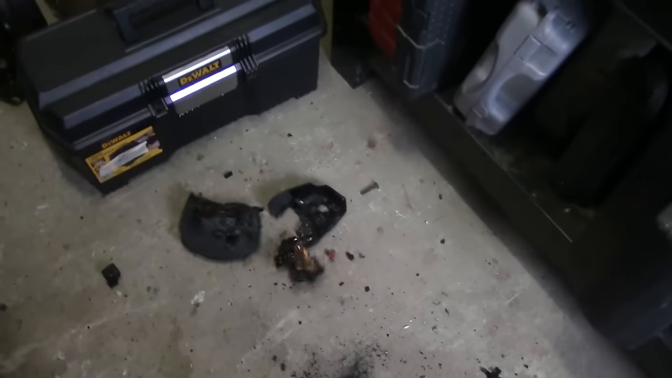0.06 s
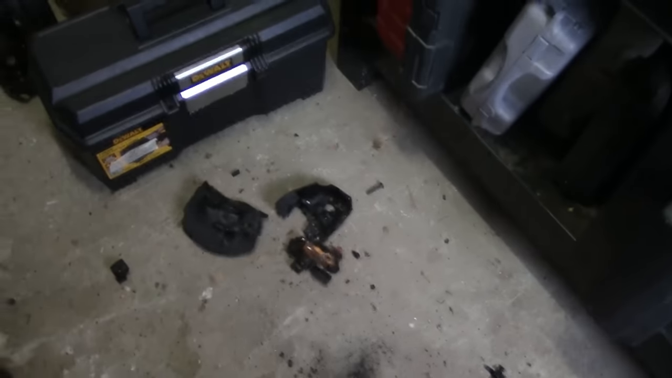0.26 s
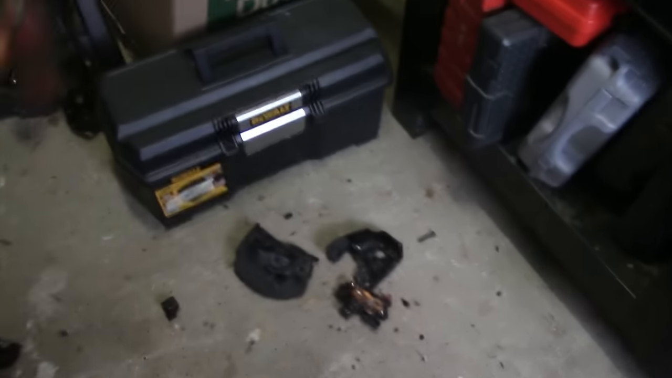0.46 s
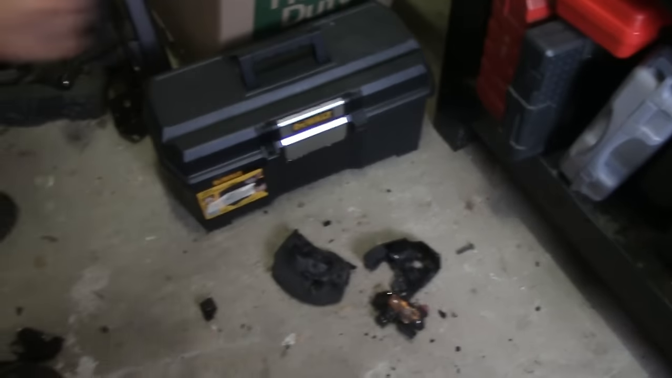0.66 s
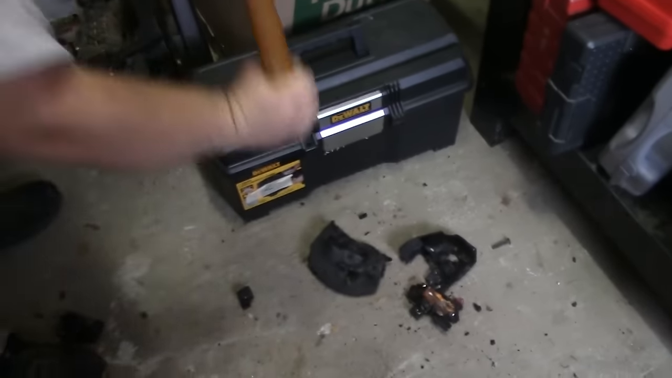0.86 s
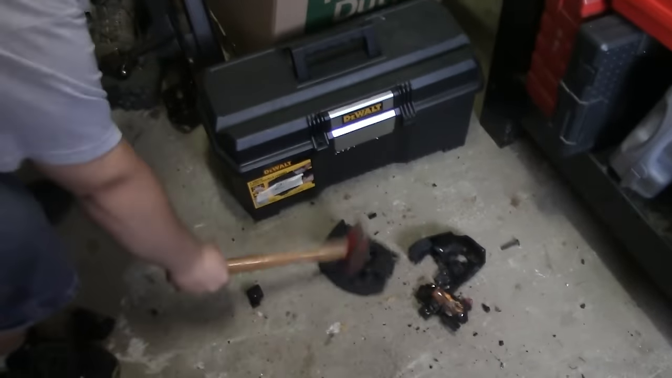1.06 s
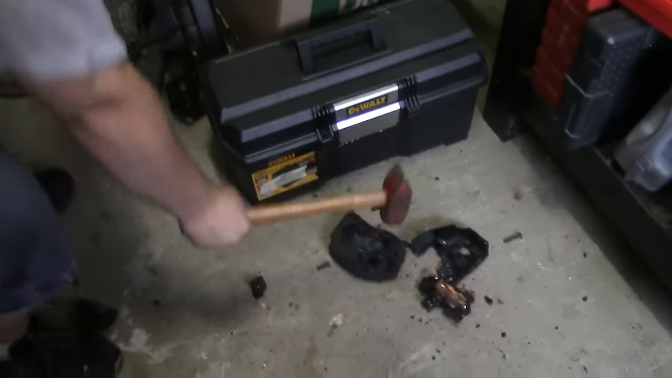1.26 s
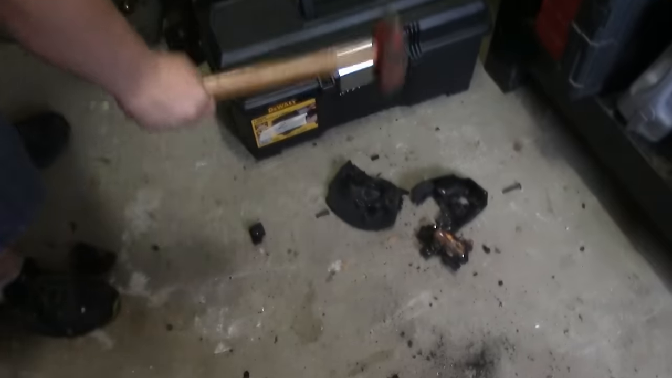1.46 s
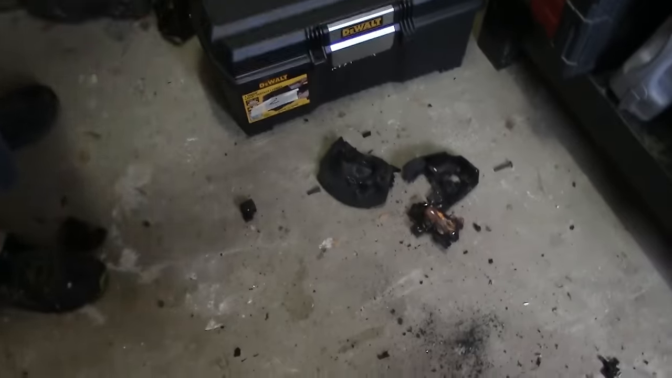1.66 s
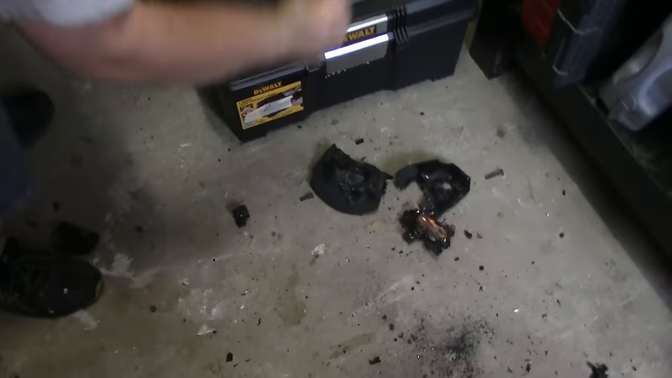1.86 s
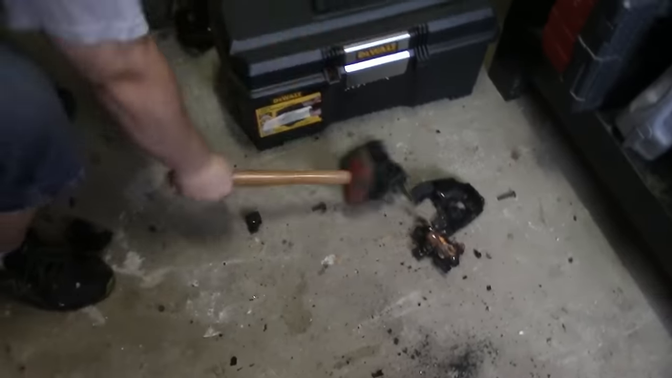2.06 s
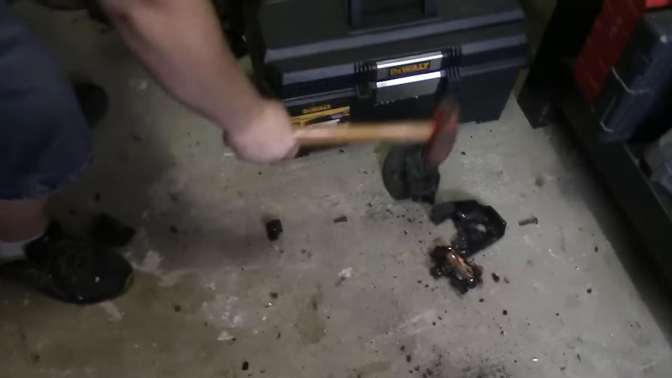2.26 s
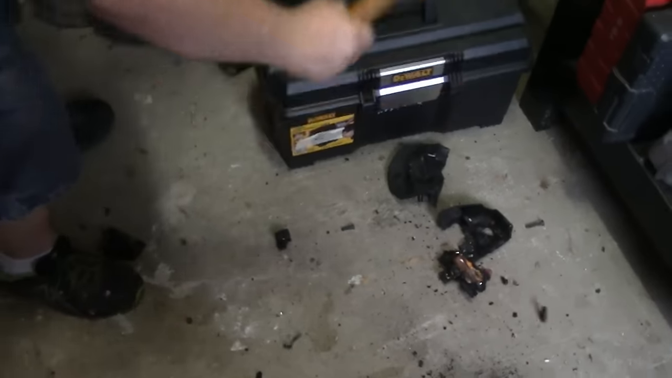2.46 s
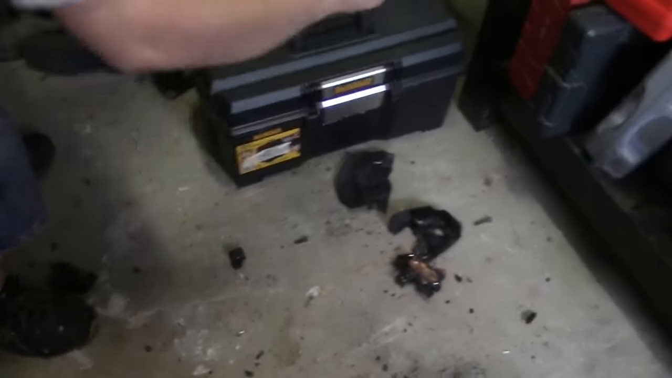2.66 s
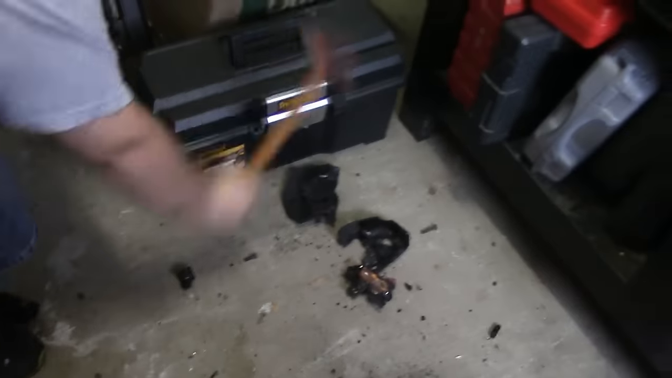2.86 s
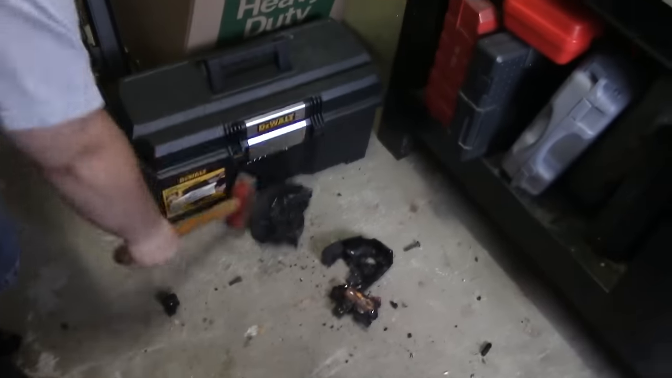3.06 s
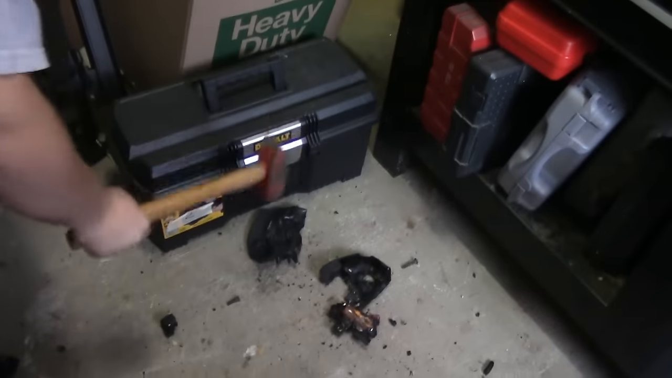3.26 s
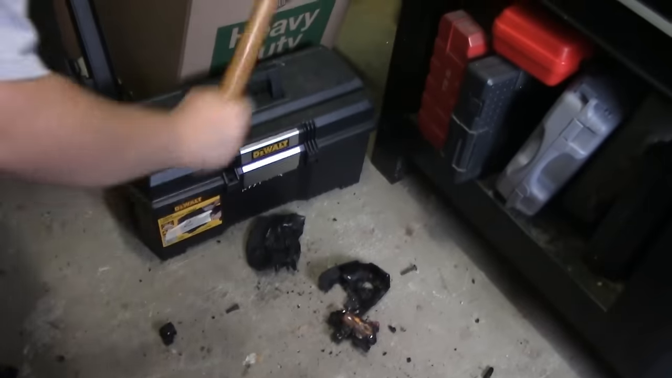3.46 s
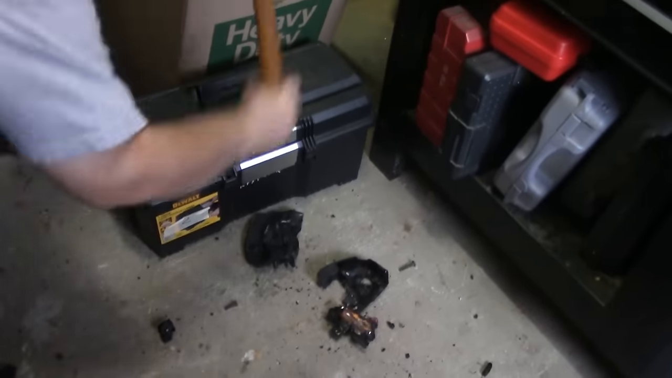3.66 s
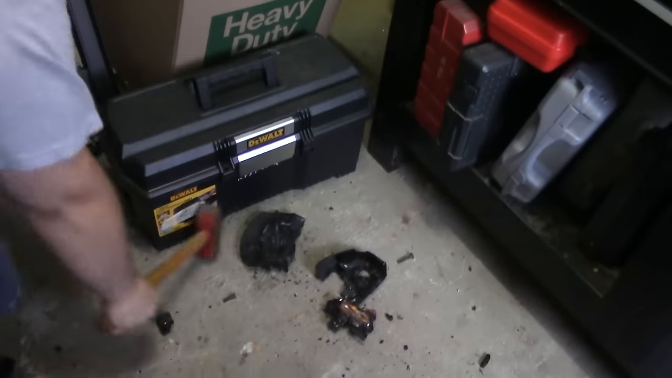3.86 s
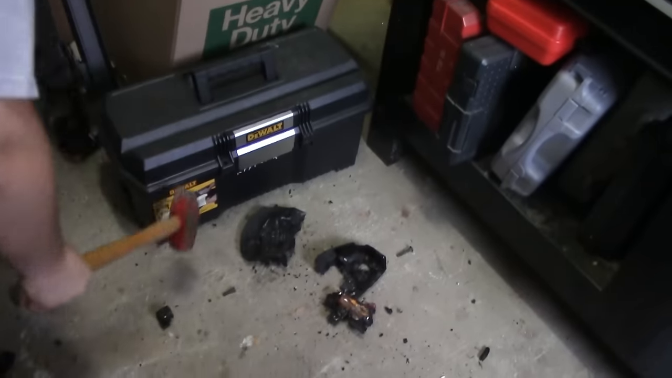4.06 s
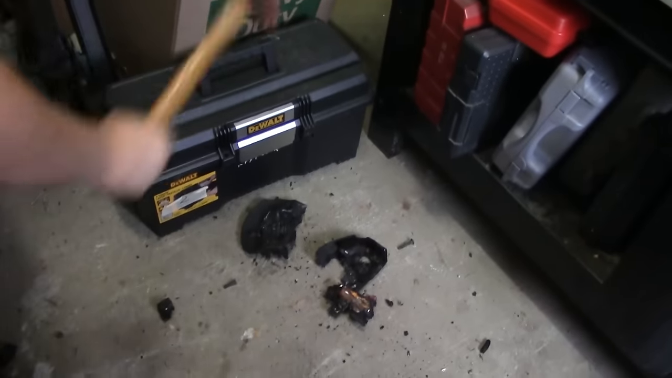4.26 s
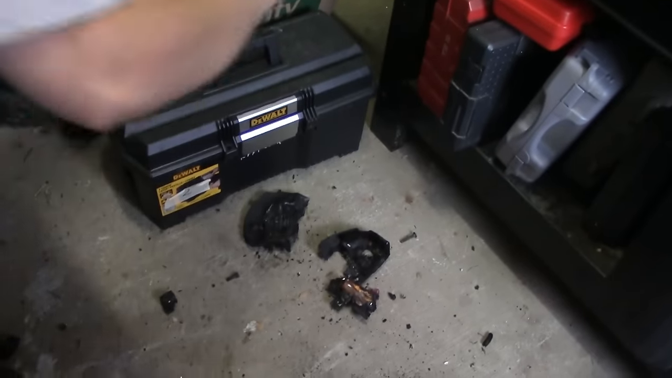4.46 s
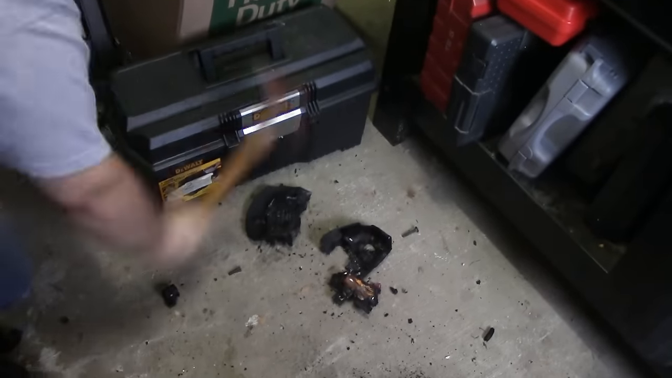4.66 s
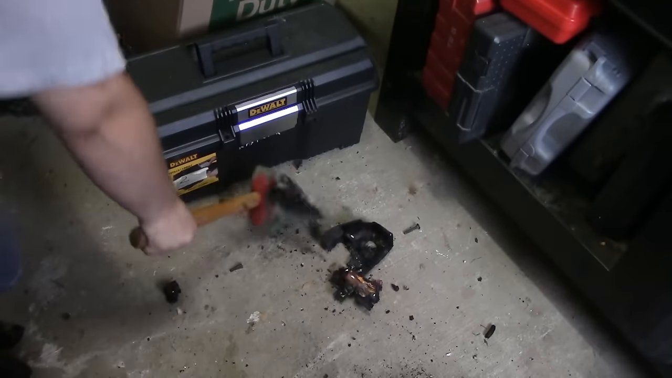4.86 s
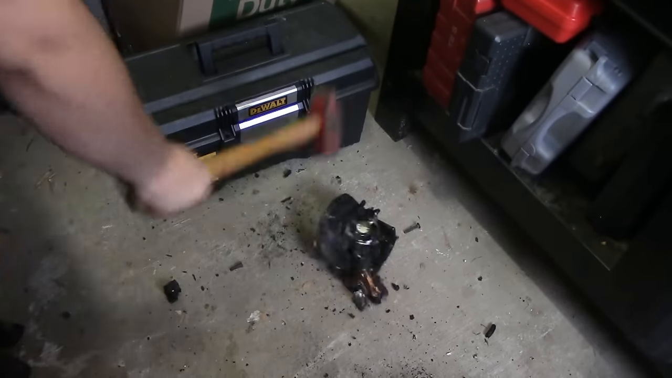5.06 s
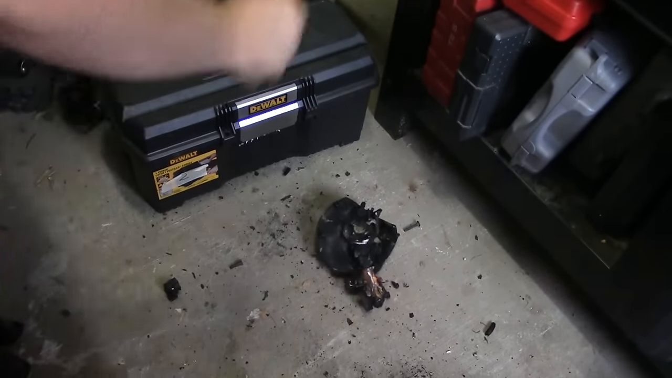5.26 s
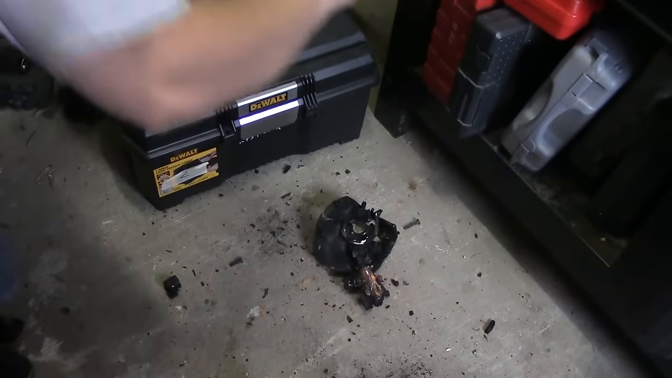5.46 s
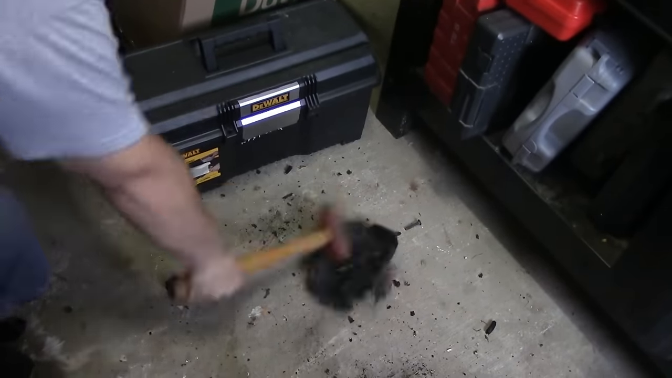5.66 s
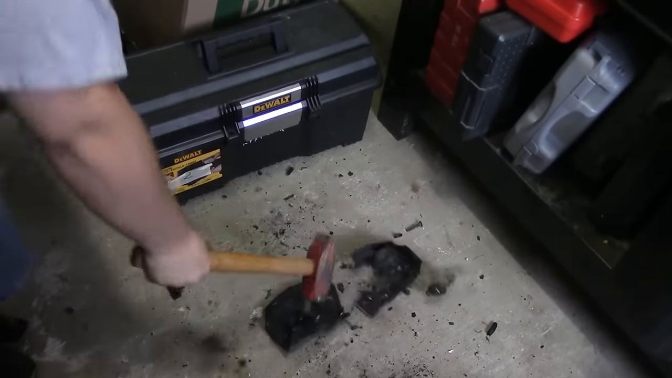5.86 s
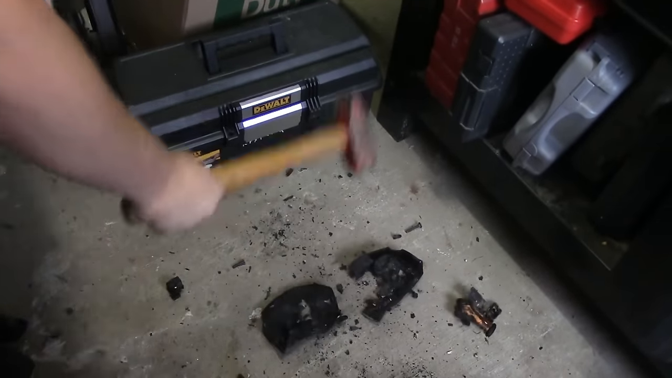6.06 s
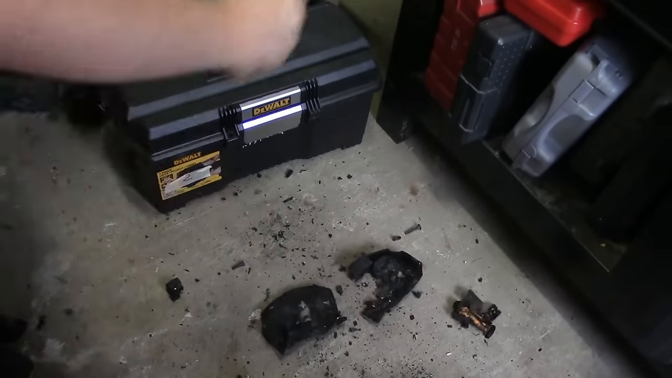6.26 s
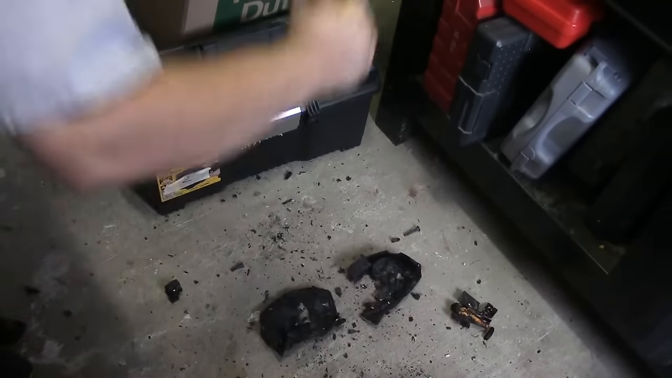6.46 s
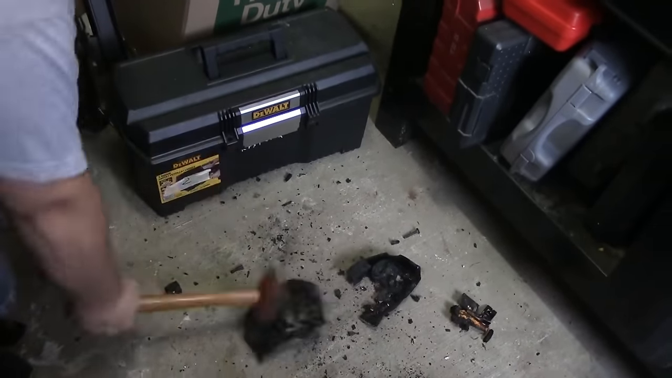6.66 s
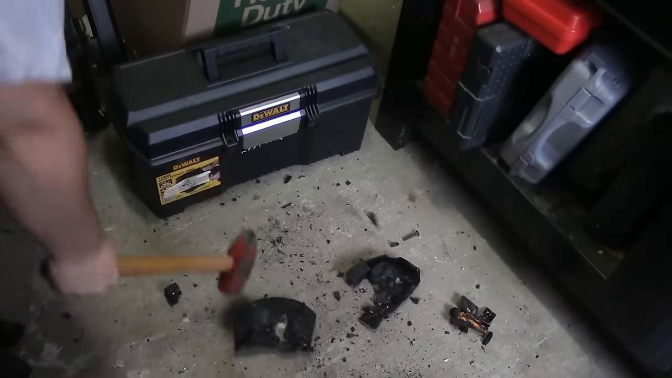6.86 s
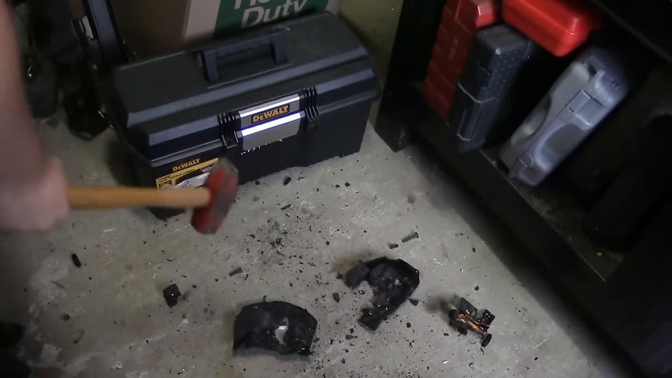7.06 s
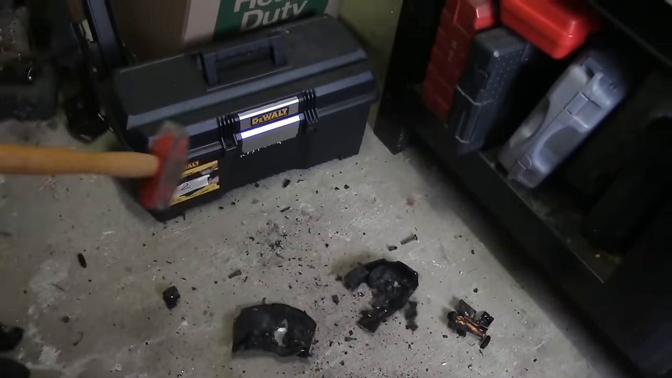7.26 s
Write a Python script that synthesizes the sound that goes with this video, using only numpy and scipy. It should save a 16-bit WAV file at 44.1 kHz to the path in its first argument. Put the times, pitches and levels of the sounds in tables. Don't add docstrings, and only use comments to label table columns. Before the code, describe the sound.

A heavy hammer smashes brittle burnt plastic on a concrete garage floor, eight sharp cracking blows with scattering shards over a faint motor hum.

```python
import sys
import numpy as np
from scipy import signal
from scipy.fft import rfft, irfft
from scipy.io import wavfile
from scipy.ndimage import uniform_filter1d

SR = 44100
rng = np.random.default_rng(int(sys.argv[2]) if len(sys.argv) > 2 else 0)


def dump_mix(stems):
    frames = np.atleast_2d(stems).T
    limited = np.clip(frames, -1, 1)
    pcm = np.round(limited * 32767).astype(np.int16)
    wavfile.write(sys.argv[1], SR, pcm)


def elevation(decibels):
    levels = np.asarray(decibels, float)
    return 10 ** (levels / 20)


N = 322715

# [f/Hz, level per Hz/dB]
AIR_SPECTRUM = [(40, -40), (70, -28), (110, -17.5), (150, -9.5), (250, -10.5), (500, -4), (900, -7.5),
                (1150, -9), (1400, -7), (2000, -12.5), (3500, -19.5), (5000, -26.5), (9000, -35),
                (16000, -47)]
# [f/Hz, level against the air/dB]
MOTOR_HUM = [(138.5, -22), (276.5, -12), (390, -14.5), (553, -16.5), (692, -19.5), (1384, -22)]
# [t/s, duck/dB, settling time/s]
DUCKS = [
    (.01, 5.5, 0.19),
    (1.12, 18.5, 0.14),
    (2.055, 5, 0.16),
    (2.965, 0.5, 0.053),
    (3.83, 1.44, .06),
    (4.755, 11.5, 0.25),
    (5.7, 4.5, 0.28),
    (6.69, 16, 0.21),
]
# [start t/s, end t/s]
HUSHES = [
    (1.106, 1.1185),
    (2.047, 2.052),
    (3.816, 3.827),
    (4.736, 4.7505),
    (5.69, 5.696),
    (6.679, 6.689),
]
# [f/Hz, time to fall 60 dB/s]
ROOM_T60 = [(60, .28), (200, 0.29), (600, .42), (1500, .42), (3000, 0.37), (6000, 0.43), (11000, .3),
            (16000, 0.099)]
# [f/Hz, side minus mid level/dB]
PORTS = [(60, -23), (200, -22), (700, -21.5), (2500, -19.5), (5000, -13), (9000, -13.5), (14000, -14.5)]
# [peak t/s, peak level/dB, swell/dB per s, fade/dB per s]
SCUFFS = [
    (.64, -56.5, 200, 129.5),
    (.885, -55, 1199, 111),
    (1.06, -67.5, 35, 299.5),
    (5.065, -42, 4500, 268),
    (5.33, -60, 1500, 198.5),
    (5.976, -51, 2503, 480),
    (6.1, -64, 107.5, 44),
]
# [t/s, peak level/dB, ring f/Hz]
CRUMBS = [(0.169, -38, 7500), (0.6501, -60, 7050), (0.8804, -55, 9910), (0.994, -46, 7900),
          (2.2084, -38, 7800), (2.32, -56, 7600), (2.3846, -64, 7820), (2.4224, -60, 7260),
          (2.5774, -61, 7380), (2.787, -59, 7360), (4.2715, -52, 11060), (4.3964, -62, 11830),
          (4.428, -60, 7000), (4.579, -57, 8430), (5.016, -46, 7200), (5.6072, -61, 7750),
          (5.8744, -47, 7200), (5.9497, -46, 9500), (5.973, -35.5, 8450), (5.9972, -33.5, 7700),
          (6.0425, -39, 8100), (6.246, -51, 7900), (6.3548, -53, 7900), (6.3746, -54.5, 7920),
          (6.3875, -47.5, 12600), (6.494, -60, 11500), (6.6433, -52, 7950), (6.891, -39.5, 7340),
          (7.1394, -57.5, 9750), (7.2504, -42.5, 11400)]
# [t/s, peak level/dB, ring f/Hz, ring t60/ms, click level/dB]
CHIPS = [
    (0.9374, -61, 5854, 18.5, -13),
    (5.972, -29.5, 6210, 27, 9),
    (5.9972, -49, 6400, 15, -3),
    (6.0724, -41.5, 6130, 13, 8),
    (6.1108, -55, 5900, 18, -1),
    (7.254, -50.5, 5240, 14, 4),
    (7.25, -58.5, 5850, 15, -5),
]
# [t/s, peak level/dB, ring f/Hz, ring t60/ms, click level/dB]
SHARDS = [(0.119, -28, 2610, 21, -12), (0.118, -25, 1270, 4.8, -3), (0.137, -29, 1330, 9.8, 1),
          (0.334, -38.5, 1150, 10, -6), (0.642, -38, 2400, 11, -9), (0.882, -41, 2900, 16, -2.5),
          (2.371, -46, 1210, 12, 14), (3.13, -32, 1660, 36, 16.5), (5.061, -29.5, 1730, 7, 1.5),
          (5.084, -35.5, 3750, 4.6, 3.5), (5.327, -43.5, 2300, 6, 3.5), (5.992, -38.5, 3000, 9, -7),
          (6.201, -46, 3360, 36, 1), (6.914, -36.5, 2900, 9.9, -4), (6.944, -43.5, 2060, 10, -6),
          (7.102, -52, 3170, 14, 2), (6.787, -25.5, 1200, 3, 0)]
# [t/s, peak level/dB]
KNOCKS = [(3.023, -14.5), (3.045, -22.5), (3.081, -23), (3.118, -37), (3.901, -18), (3.925, -26.5),
          (3.939, -26.5), (4.786, -16.5), (4.8, -14), (4.804, -18.5), (4.819, -12.5), (4.826, -18.5),
          (4.861, -28), (4.892, -24.5)]
# [f/Hz, level/dB, t60/s]
CHEST_MODES = [(166.7, -2, 0.15), (242.7, -4.5, .07), (307.4, 3.5, 0.081), (392.7, -4, 0.033),
               (560, -8.5, 0.01), (790, -13, 0.023)]
# [t/s, peak level/dB, ring f/Hz, deep
# share/dB, upper share/dB]
THUDS = [
    (1.1251, -12, 160, 1, -2.5),
    (2.058, -17, 242.3, -23.5, 4),
    (2.969, -41, 205, -19, -13),
    (3.835, -25.5, 254.4, -33, -2.5),
    (4.757, -12, 234, 0, 8),
    (5.703, -26, 317, -2.5, -17),
    (6.697, -12, 197.6, -10, -5),
    (6.786, -23, 336, -24.5, -3),
]
# [t/s, crack level/dB, splinter treble lift/dB, share sent to the walls/dB]
BLOWS = [
    (0.0001, -16.5, -9.5, -18),
    (0.0100, -12, 1, 6.5),
    (1.1224, -8.5, 0, 4.5),
    (2.0560, -9.5, 4, 6),
    (2.9672, -10.5, 4, 2.5),
    (3.8302, -13, 7.5, 6),
    (4.7540, -6.5, 2, 2),
    (5.7, -5, 2.5, 2.5),
    (6.6935, -4.5, 5, 0),
]
# [delay/ms, contact level/dB]
CONTACTS = [
    (3.7, -18),
    (1.5, -8),
    (3.8, -2),
    (2.4, -5.5),
    (2.5, -19),
    (2.6, -8.5),
    (3, -8.5),
    (7, -16),
    (4.9, -16),
]
# [f/Hz, level per Hz/dB]
CRACK_SPECTRUM = [(60, -48.5), (120, -27.5), (300, -18), (700, -14), (1500, -7), (3000, -4.5), (6000, -11),
                  (10000, -14), (13000, -20), (15300, -27), (16500, -38)]
# [f/Hz, width/Hz, level/dB]
SHELL_1 = [(850, 160, -1), (2400, 400, -10)]
SHELL_2 = [(800, 260, -0.61), (1250, 210, 0.99), (3090, 220, -1)]
SHELL_3 = [(600, 200, -10), (1340, 300, -0.5), (2800, 370, 6.5), (4630, 250, -11)]
SHELL_4 = [(1590, 170, 4.5), (2600, 1000, 0), (3230, 260, 1.5)]
SHELL_5 = [(1206, 89, 0), (1595, 120, 3), (2503, 440, 0), (3650, 520, -3.5)]
SHELL_6 = [(786, 280, -3), (1550, 91, 1), (2900, 1100, 3), (7500, 800, -17)]
SHELL_7 = [(840, 330, -5.5), (1670, 94, -1), (2380, 480, -1.5), (3330, 226, 0)]
SHELL_8 = [(1293, 270, -14.5), (2460, 250, -1.5), (4482, 630, -11.5)]
SHELL_9 = [(795, 94, -8), (2215, 140, -8), (2640, 480, 7.5)]

AIR_DB, AIR_SIDE_DB, CREEP_DB_PER_S = -48.5, -20, 6
ROOM_DB, ROOM_GAP_S = -4.5, 0.0025
CRUMB_T60_MS, CRUMB_CLICK_DB = 1.0, 2.5


def unit(x):
    return x / np.sqrt(np.mean(x ** 2))


def read(table, hz):
    f, value = np.transpose(table)
    return np.interp(np.log(hz + 1), np.log(f), value)


def colour(x, table):
    hz = np.fft.rfftfreq(x.shape[-1], 1 / SR)
    return irfft(rfft(x) * elevation(read(table, hz)), x.shape[-1])


def band(x, lo_hz, hi_hz):
    return signal.sosfilt(signal.butter(2, [lo_hz, hi_hz], "band", fs=SR, output="sos"), x)


def ring(x, hz, t60):
    shrink = np.exp(-np.log(1000) / (t60 * SR))
    pole = shrink * np.exp(2j * np.pi * hz / SR)
    return np.sqrt(2 * (1 - shrink ** 2)) * signal.lfilter([1], [1, -pole], x).imag


def soft(x, ms):
    return np.convolve(x, np.hanning(int(ms * SR / 1000) + 3))[:len(x)]


def walk(rate):
    k = int(SR / rate)
    steps = np.repeat(rng.standard_normal(N // k + 1), k)
    return unit(uniform_filter1d(steps, k)[:N])


def causal(db):
    cepstrum = irfft(db * np.log(10) / 20)
    cepstrum[1:len(db) - 1] *= 2
    cepstrum[len(db):] = 0
    return np.exp(rfft(cepstrum))


def add(out, s, voice, burst, db, wall_db):
    i = int(s * SR)
    near = voice(burst)
    near = elevation(db) * near / np.abs(near).max()
    wall = unit(voice(signal.unit_impulse(len(burst))))
    wall = elevation(wall_db) * wall * np.sqrt(np.mean(near ** 2))
    out[:, i:i + len(near)] += np.array([near, wall])[:, :N - i]


def gain_db(t):
    pushed = sum(db * (1 - np.exp(-np.maximum(t - s, 0) / tau)) for s, db, tau in DUCKS)
    return CREEP_DB_PER_S * t - pushed


def air():
    mid, side = unit(colour(rng.standard_normal((2, N)), AIR_SPECTRUM))
    t = np.arange(N) / SR
    hum = 0
    for hz, db in MOTOR_HUM:
        strength = elevation(db + 2 * walk(14))
        hum = hum + strength * np.sin(2 * np.pi * hz * t + 0.5 * walk(22))
    mid = mid * elevation(0.6 * walk(14))
    sides = elevation(AIR_SIDE_DB) * np.array([side, -side])
    return elevation(AIR_DB + gain_db(t)) * (mid + 2.2 * hum + sides)


def garage(x):
    t = np.arange(SR // 2) / SR
    noise = rfft(rng.standard_normal((2, len(t))))
    hz = np.fft.rfftfreq(len(t), 1 / SR)
    echo = 0
    for centre in 40 * 2 ** np.arange(0, 9, 0.5):
        share = np.clip(1 - 2 * np.abs(np.log2((hz + 1) / centre)), 0, 1)
        echo = echo + irfft(noise * share, len(t)) * elevation(-60 * t / read(ROOM_T60, centre))
    echo = echo * np.clip(t / ROOM_GAP_S, 0, 1) ** 2 / np.sqrt(np.sum(echo[0] ** 2))
    echo[1] = colour(echo[1], PORTS)
    mid, side = (signal.fftconvolve(x, e)[:N] for e in echo)
    return elevation(ROOM_DB) * (mid + np.array([side, -side]))


def scuff():
    grains = rng.standard_normal(N) * elevation(2 * rng.exponential(1, N))
    grit = unit(band(band(grains, 810, 4900), 700, 13000))
    t = np.arange(N) / SR
    slides = 0
    for s, db, swell, fade in SCUFFS:
        slides = slides + elevation(db - np.maximum(swell * (s - t), fade * (t - s)))
    return grit * slides * elevation(2.2 * walk(46))


def debris(rows, lo_hz, hi_hz, wall_db):
    out, t = np.zeros((2, N)), np.arange(4096) / SR
    for s, db, hz, t60_ms, click_db in rows:
        def piece(x):
            return band(unit(ring(x, hz, t60_ms / 1000)) + elevation(click_db) * unit(x), lo_hz, hi_hz)
        landing = rng.standard_normal(len(t)) * t ** 0.52 * np.exp(-t / 0.0016)
        add(out, s, piece, landing, db + 4.0, wall_db)
    return out


def knocks():
    out = np.zeros((2, N))
    for s, db in KNOCKS:
        chance = rng.standard_normal((len(CHEST_MODES), 2))

        def chest(x):
            x = band(soft(x, 0.25), 200, 1600)
            return sum(elevation(g + 2 * a) * ring(x, hz * (1 + 0.017 * b), t60)
                       for (hz, g, t60), (a, b) in zip(CHEST_MODES, chance))
        add(out, s, chest, signal.unit_impulse(8192), db + 0.28, -4)
    return out


def thuds():
    out = np.zeros((2, N))
    for s, db, hz, deep_db, upper_db in THUDS:
        def slab(x):
            x = soft(np.diff(x, prepend=0), 1.8)
            deep = elevation(deep_db) * ring(x, 84, 0.037)
            upper = elevation(upper_db) * ring(x, 1.6 * hz, 0.0072)
            return ring(x, hz, 0.011) + deep + upper
        add(out, s, slab, signal.unit_impulse(8192), db, -4)
    return out


def blows():
    out, t, f = np.zeros((2, N)), np.arange(4096) / SR, np.fft.rfftfreq(4096, 1 / SR)
    shells = SHELL_1, SHELL_2, SHELL_3, SHELL_4, SHELL_5, SHELL_6, SHELL_7, SHELL_8, SHELL_9
    for (s, crack_db, treble_db, wall_db), (gap_ms, slab_db), modes in zip(BLOWS, CONTACTS, shells):
        lift_db = treble_db * np.clip(np.log2((f + 1) / 3500), 0, 1)
        power = elevation(read(CRACK_SPECTRUM, f) + lift_db) ** 2
        for hz, width, g in modes:
            power = power + elevation(g) ** 2 / (1 + ((f - hz) / max(width, 150)) ** 2) ** 2
        response = causal(10 * np.log10(power))

        def shell(x):
            return irfft(rfft(x) * response)
        crack, slab = rng.standard_normal((2, len(t))) * np.sqrt(t) * np.exp(-t / 0.0017)
        shed = rng.standard_normal(len(t)) * (rng.random(len(t)) < 0.02)
        slab = slab + elevation(-46.5) * shed * np.exp(-t / 0.057)
        add(out, s, shell, crack, crack_db + 9.5, wall_db)
        add(out, s + gap_ms / 1000, shell, slab, slab_db + 10.5, -30)
    return out


def scene():
    crumb_rows = [(*row, CRUMB_T60_MS, CRUMB_CLICK_DB) for row in CRUMBS]
    pieces = debris(SHARDS, 600, 7600, 2.4) + debris(CHIPS, 2250, 13000, 5.0)
    pieces = pieces + debris(crumb_rows, 5000, 14000, -2)
    near, walls = blows() + thuds() + knocks() + pieces + scuff()
    skew = elevation(-5) * np.roll(colour(near, PORTS), 30)
    direct = near * elevation(np.array([[-0.12], [0.12]])) + np.array([skew, -skew])
    return direct + garage(walls) + air()


def low_pass(x):
    return signal.sosfilt(signal.butter(12, 16750, fs=SR, output="sos"), x)


def record(dry):
    x = signal.sosfilt(signal.butter(3, 90, "high", fs=SR, output="sos"), dry)
    t = np.arange(N) / SR
    hush = sum((t > start) & (t < end) for start, end in HUSHES)
    low = signal.sosfiltfilt(signal.butter(4, 1100, fs=SR, output="sos"), x)
    x = x - uniform_filter1d(1.0 * hush, size=60) * (x - low)
    rounded = np.tanh(0.99 * x) / 1.125
    top_cut = signal.ellip(8, 0.2, 70, 15900, fs=SR, output="sos")
    return low_pass(signal.sosfilt(top_cut, rounded))


dry = scene()
out = record(dry)
dump_mix(out)
```